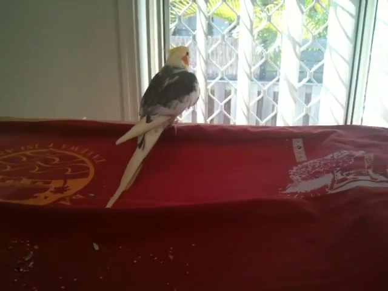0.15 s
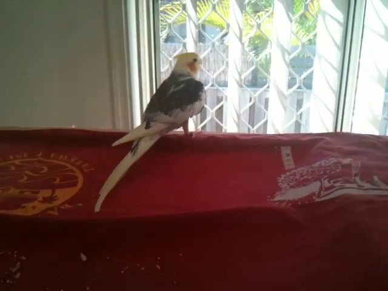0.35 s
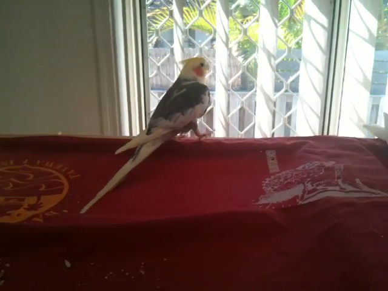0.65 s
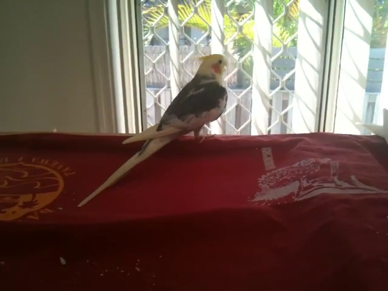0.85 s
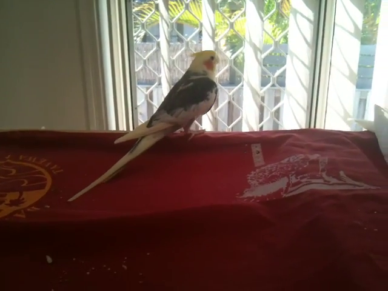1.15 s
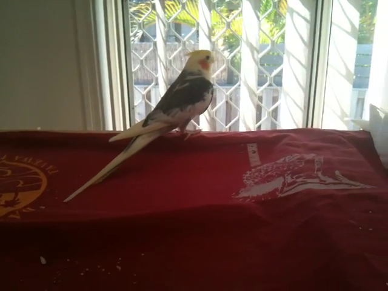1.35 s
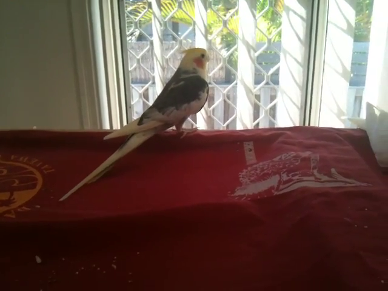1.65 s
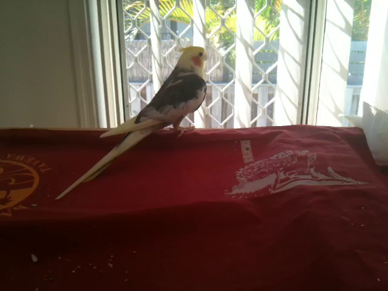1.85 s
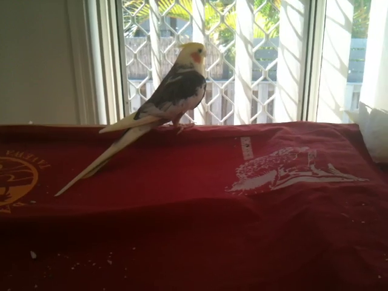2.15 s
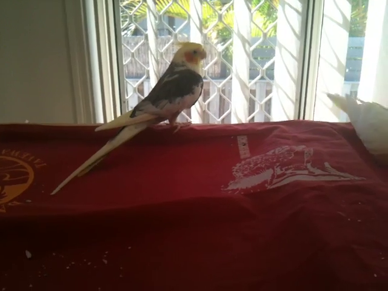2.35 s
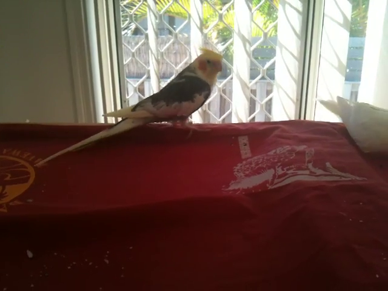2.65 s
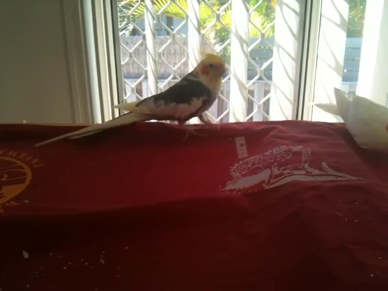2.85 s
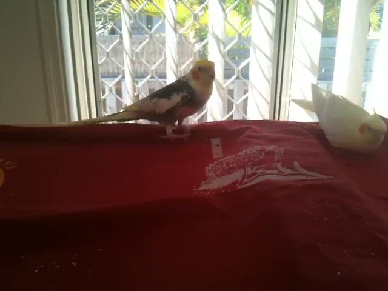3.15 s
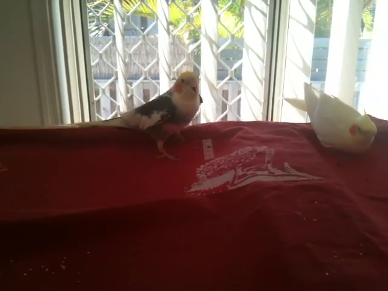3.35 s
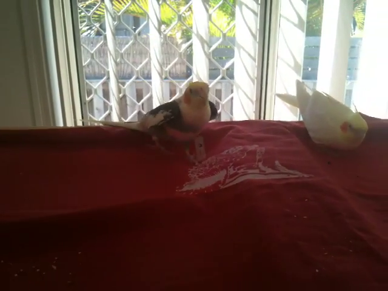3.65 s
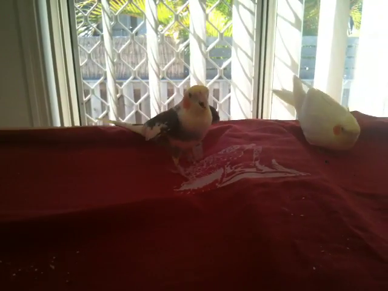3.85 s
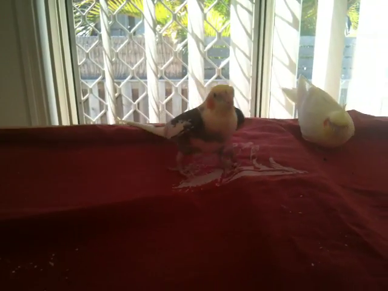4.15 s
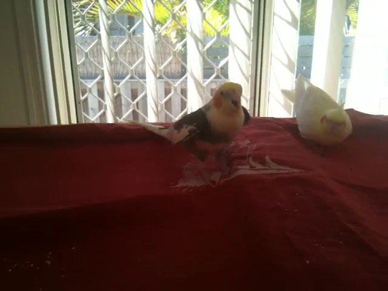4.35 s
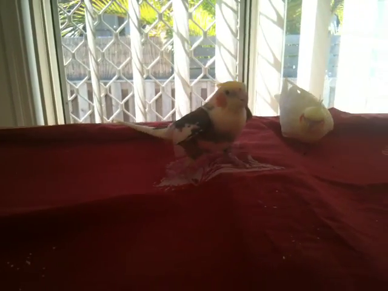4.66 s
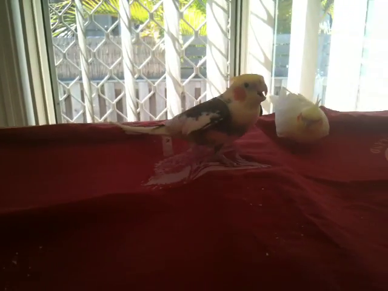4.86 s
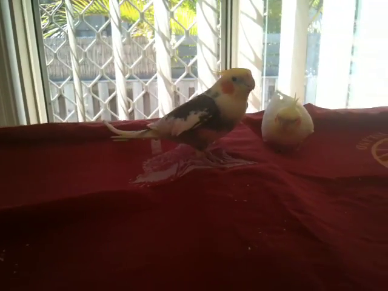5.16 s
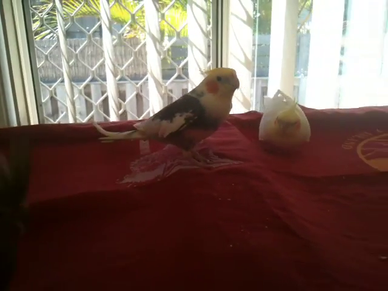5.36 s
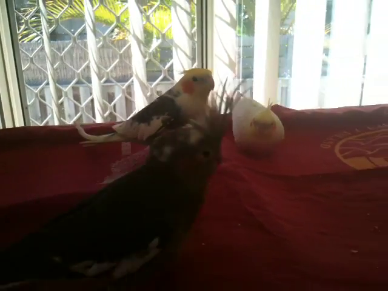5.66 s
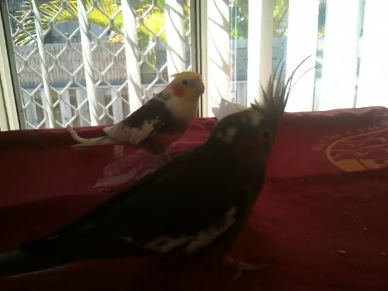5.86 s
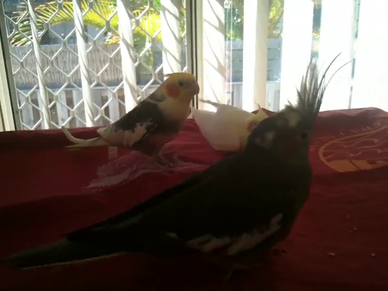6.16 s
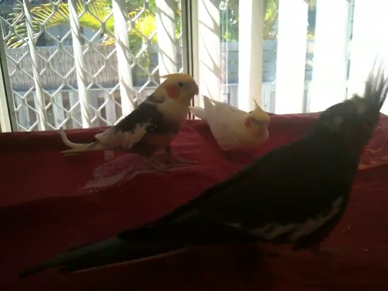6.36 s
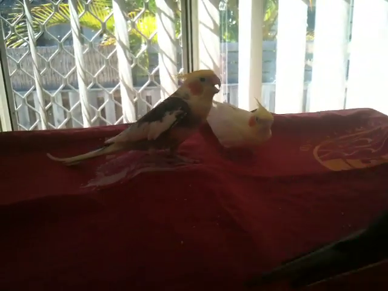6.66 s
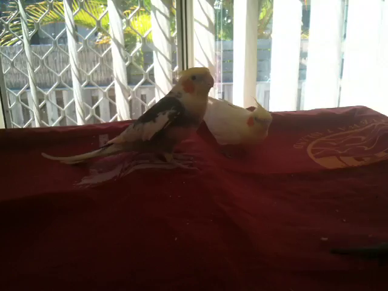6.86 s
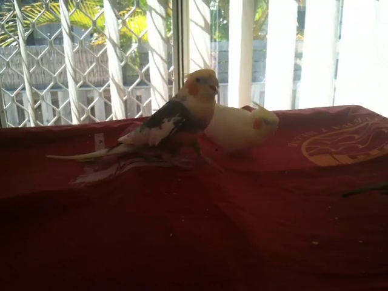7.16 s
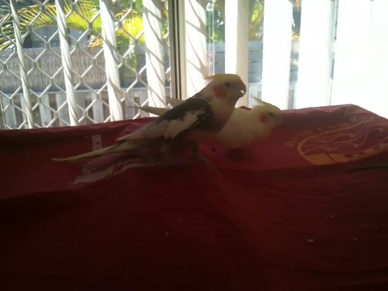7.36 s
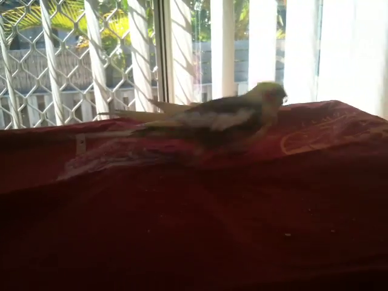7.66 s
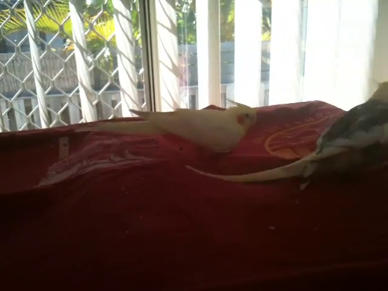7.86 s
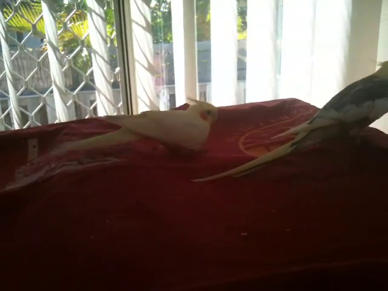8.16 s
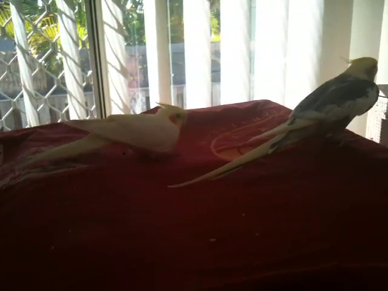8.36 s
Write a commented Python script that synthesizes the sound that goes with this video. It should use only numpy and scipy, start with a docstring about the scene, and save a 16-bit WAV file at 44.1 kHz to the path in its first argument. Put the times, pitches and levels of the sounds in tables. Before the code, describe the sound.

Piercing cockatiel calls repeat about twice a second in three bursts, with faint feather and cloth rustles between them indoors.

```python
"""A cockatiel's call is already sounding, with a higher, nearly pure whistle over it; three bursts of calls follow.
Each call is a stack of harmonics that slides up, cracks hoarsely into a lower register and holds a quavering note.
Between calls, shaped noise makes feathers and cloth rustle and a foot thump softly on the sofa.
Soft room noise and a faint wavering hum lie below; random echoes put the bird in a live room."""
import sys
import numpy as np
from scipy import signal
from scipy.fft import rfft, irfft, next_fast_len
from scipy.io import wavfile
from scipy.ndimage import map_coordinates

SR = 44100
rng = np.random.default_rng(int(sys.argv[2]) if len(sys.argv) > 2 else 0)


def master_out(mix):
    """Clip the mix to full scale and print it as 16-bit PCM to the path in sys.argv[1]."""
    frames = np.transpose(np.atleast_2d(mix))
    ceiling = np.clip(frames, -1, 1)
    pcm = np.round(ceiling * 32767).astype(np.int16)
    wavfile.write(sys.argv[1], SR, pcm)


N = 374850
LEAD = SR // 5  # samples made before time zero, as the first call is already under way
TIME = np.arange(-LEAD, N) / SR  # seconds

# Noise colours below give relative levels only: each noise is scaled to its own loudness afterwards.
# Colour of the room noise: pitch_hz, level_db (per Hz)
ROOM_TONE = [(25, -37), (60, -28), (82, -13), (95, -20), (125, -10), (165, -6.5), (250, -9.5), (500, -8.5),
             (700, -13.5), (1000, -16), (2300, -28), (5000, -30.5), (5750, -26), (6400, -30),
             (10000, -30.5), (15500, -34)]
# Steady tones of the hum, before a shared trim and waver: pitch_hz, level_db
HUM = [(177.6, -76.5), (301.5, -76), (339.1, -77), (393.0, -80.5)]
# Colour of feathers and cloth: pitch_hz, level_db (per Hz)
FEATHERS = [(150, -14), (450, -1), (1200, -3), (2500, -1), (5000, -2), (8000, -9), (15000, -16)]
# Rustles of feathers, claws and cloth: start_s, level_db, rise_s, decay_s
RUSTLES = [(2.88, -73, 0.0027, .05), (2.935, -70.5, 0.0007, .04), (5.655, -63, 0.0046, .25),
           (5.79, -69, .004, .1), (5.87, -68, .01, 0.33), (6.14, -64, .04, 0.38), (6.175, -55.5, .025, .32),
           (6.34, -65, .015, 0.29), (6.39, -69, .005, .15), (6.507, -65, 0.00081, 0.032),
           (6.531, -67, .001, 0.033), (7.915, -59, .025, 0.26)]
# Dull colour of a foot landing on the sofa: pitch_hz, level_db (per Hz)
CUSHION = [(100, -20), (270, 0), (600, -1), (1300, -8), (3000, -25), (12000, -45)]
# Path of the higher whistle, level before a trim: time_s, pitch_hz, level_db
HIGH_WHISTLE = [(-.06, 3150, -38), (-.02, 3485, -28.5), (0, 3360, -16.5), (0.014, 3337, -16),
                (.019, 3324, -42.5), (0.026, 3340, -46), (.03, 3290, -21), (.042, 2890, -29),
                (.055, 2500, -34), (.075, 2350, -50)]
# Throat and beak, as they colour the upper overtones: pitch_hz, level_db
BEAK = [(5200, 13), (5900, 2), (6600, 6.5), (7400, 1), (8600, -3), (9400, -13.5), (10300, -1.5),
        (11100, -4.5), (11900, -7), (12600, -14.5), (13200, -20), (14000, -36), (15300, -22), (16500, -33)]
# Colour of hoarse air: pitch_hz, level_db (per Hz)
RASP = [(200, -43.5), (600, -22), (1150, -12.5), (1500, -14), (2200, -13), (3200, -4), (4600, 3),
        (5800, -8.5), (7000, 1.5), (8500, -23.5), (9500, -20), (11000, -15), (12500, -27), (15000, -33)]
# Every call runs through the same stages: 0 onset, 1 slide, 2 summit, 3 break, 4 sag, 5 end.
# Loudness of a call, before each call's own levels: stage, fundamental_db, octave_db, upper_overtones_db
VOICE = [(0, -51, -53, -51), (1, -44, -40.5, -38), (1.12, -38.5, -30.5, -35), (1.22, -33.5, -19.3, -32),
         (1.33, -31.3, -18.7, -32.5), (1.6, -29.7, -22, -35), (2, -28.5, -25, -39.5),
         (2.5, -28.3, -31.5, -35), (3, -28.5, -45, -33), (3.25, -29, -39.5, -31.3),
         (3.5, -27.3, -29, -29.3), (3.8, -27, -27.5, -34.3), (4, -27, -33.5, -43), (4.6, -27, -41.5, -53.5),
         (5, -31, -46, -62)]
# Depth of the pitch's unsteadiness: stage, flutter_hz (regular), jitter_hz (random)
QUAVER = [(0, 35, 12), (1, 16, 10), (1.6, 14, 9), (1.85, 50, 12), (2.3, 110, 20), (2.7, 90, 40),
          (3, 50, 100), (3.18, 18, 16), (3.55, 9, 7), (3.8, 46, 14), (5, 58, 24)]
# One row per call; the levels are changes to the shared voice, except the two rasps:
#   slide_start_s, summit_s, break_s, sag_s, end_s,
#   start_hz, summit_hz, bend (1 = straight slide), held_hz, sag_hz, end_hz,
#   onset_db, slide_db, held_db, slide_overtones_db, held_octave_db, held_upper_overtones_db,
#   break_rasp_db, sag_rasp_db, extra_room_db (as the head turns away)
SONG = [(-.1, .04, .08, .215, .244, 1750, 2660, 2.2, 2200, 2090, 2100, 0, -1.5, -2, -1.5, -.5, -2, -43, -60, 4),
        (.387, .523, .565, .7, .724, 1760, 2700, 1.25, 2184, 2060, 2060, -2, -.5, -1.5, -1.5, .5, -1, -41, -60, 1.5),
        (.876, 1.02, 1.063, 1.165, 1.204, 1800, 2635, 2.2, 2178, 2088, 2170, 1, -2, -1, -.5, -.5, -.5, -45, -60, 2.5),
        (3.003, 3.132, 3.175, 3.29, 3.308, 1820, 2765, 1.25, 2230, 2130, 2130, -2, 2.5, -.5, -.5, -1, 1.5, -37, -60, -1.5),
        (3.427, 3.558, 3.598, 3.69, 3.734, 1780, 2625, 1.9, 2255, 2090, 2190, 3.5, 1.5, -1, 1, 3, 3.5, -37, -60, -1.5),
        (3.879, 4.007, 4.04, 4.153, 4.182, 1785, 2705, 1.5, 2185, 2090, 2130, 5.5, 2, 2.5, 0, .5, -1, -40, -47, -2.5),
        (4.319, 4.448, 4.492, 4.605, 4.66, 1750, 2670, 1.4, 2185, 2060, 2210, 2.5, 2, 1, 2, 2, 5, -39, -48, -3),
        (4.802, 4.928, 4.977, 5.08, 5.124, 1770, 2660, 1.3, 2165, 2040, 2140, 3, 1, -.5, 2.5, 5, 4, -39, -44, -3.5),
        (6.587, 6.703, 6.745, 6.865, 6.888, 1800, 2685, 1.75, 2215, 2225, 2380, -2.5, 2.5, 5.5, -.5, -6, -7.5, -40, -60, -1),
        (7.018, 7.152, 7.195, 7.305, 7.355, 1790, 2780, 1.25, 2220, 2090, 2280, -2.5, 0, 1.5, 2.5, 2, -.5, -46, -60, -1.5),
        (7.494, 7.631, 7.681, 7.783, 7.82, 1840, 2670, 1.45, 2255, 2040, 2250, 3, -1.5, 2, -.5, -1.5, 0, -44, -54, -1.5),
        (7.957, 8.08, 8.125, 8.232, 8.28, 1840, 2720, 1.25, 2175, 2030, 2190, 3.5, 0, -2, -3.5, -2, 1.5, -41, -60, 1.5)]
# How fast echoes fade by 60 dB: pitch_hz, fade_s
ROOM_DECAY = [(300, .6), (2200, 0.87), (4300, 0.62), (7000, 0.53), (11000, 0.33), (15000, 0.27)]
# The beak beams its treble at the walls: pitch_hz, reflected_db
BEAMING = [(2200, .5), (4500, 0.5), (7000, 2), (11000, 4.5), (15000, 2)]
# The microphone's dips in the treble: pitch_hz, level_db
MICROPHONE = [(5150, 0), (5750, -6), (6400, 0), (11200, 0), (12000, -4), (13000, 0), (15300, 0),
              (15800, -5)]

STEP_S, STEP_DB = 7.905, -56  # time and level of the footfall
ONSET_S = .023  # the voice starts softly, on one pitch, this long before the slide
LANDING = .975  # pitch at the break, as a share of the held pitch
LANDING_LEAD_S = .011  # the tumble lands this long before the hoarse break
CREST_SHARE = .48  # how far from break to sag the held note crests
CATCH_S, SAG_CATCH_LAG_S = .012, .012  # width of a hoarse catch; delay of the second one after the sag
VOICE_DB = -1.3  # trim of the whole whistle
SLIDE_TILT_DB, HELD_TILT_DB = .8, -1.3  # per harmonic, among upper overtones: the slide is shriller
TOP_HZ = 15800  # nothing above this is kept


def amp(db):
    """Turn decibels into a gain."""
    return 10 ** (np.asarray(db) / 20)


def unit(x):
    """Scale to an rms (average strength) of 1."""
    return x / np.sqrt(np.mean(x ** 2) + 1e-20)


def along(points, hz):
    """Read a curve of (pitch, value) points, with pitch on a log axis."""
    pitches, values = np.transpose(points)
    return np.interp(np.log(hz + 1), np.log(pitches), values)


def curves(rows, at):
    """Join each column after the first by straight lines."""
    positions, *columns = np.transpose(rows)
    return [np.interp(at, positions, column) for column in columns]


def wobble(rate, size):
    """Draw a smooth random curve through `rate` random points a second."""
    points = rng.standard_normal(size // 8 + 4)
    return map_coordinates(points, [np.arange(size) * rate / SR])


def noise(spectrum, size):
    """Filter white noise to a colour, with an rms of 1."""
    gain = amp(along(spectrum, np.fft.rfftfreq(size, 1 / SR)))
    white = rng.standard_normal(size)
    return unit(irfft(rfft(white) * gain, size))


def add(track, start, x):
    """Mix a sound into the track from its start time on."""
    first = max(round(start * SR) + LEAD, 0)
    part = track[first:][:len(x)]
    part += x[:len(part)]


def swell_and_fade(rise, decay):
    """Rise like half a bell curve up to time zero, then fade by 60 dB over the decay."""
    t = np.arange(-2 * rise, decay, 1 / SR)
    rising = np.exp(-(t / rise) ** 2)
    fading = np.exp(-np.log(1000) * t / decay)
    return t, np.where(t < 0, rising, fading)


def background(floor_db=-66, hum_db=-1.5, waver_db=3.5):
    """Soft room noise and the hum of an appliance, each tone slowly wavering in loudness."""
    size = len(TIME)
    hum = np.zeros(size)
    for hz, db in HUM:
        hum += amp(db + hum_db + waver_db * wobble(3, size)) * np.sin(2 * np.pi * hz * TIME)
    return amp(floor_db) * noise(ROOM_TONE, size) + np.sqrt(2) * hum


def in_room(x, wet_db=0, tail_db=-11.5, walls_db=-14):
    """Add near reflections and a fading wash of echoes, drawn anew for each sound."""
    hz, t, z = signal.stft(rng.standard_normal(SR), SR, nperseg=256)
    # each pitch in the noise fades at its own speed
    fade = amp(-60 * t / along(ROOM_DECAY, hz)[:, None])
    tail = signal.istft(z * fade, SR, nperseg=256)[1]
    echoes = amp(tail_db) * tail[:SR] / np.linalg.norm(tail)
    count = 6
    delays = rng.uniform(.002, .022, count)  # seconds
    echoes[(delays * SR).astype(int)] += amp(walls_db) * rng.choice([-1, 1], count) / np.sqrt(count)
    beam = amp(wet_db + along(BEAMING, np.fft.rfftfreq(2 * SR, 1 / SR)))
    response = irfft(rfft(echoes, 2 * SR) * beam)[:SR]
    response[0] += 1  # the direct sound
    # a head turned away sends less sound to the microphone
    return signal.fftconvolve(x, response) * amp(-.25 * wet_db)


def rustle(level_db, rise, decay, grain_db=3.8):
    """Feathers or cloth: noise with random grain that swells and dies away."""
    t, swell = swell_and_fade(rise, decay)
    grain = amp(grain_db * wobble(300, len(t)))
    return t[0], amp(level_db) * swell * unit(noise(FEATHERS, len(t)) * grain)


def footfall(rise=.006, decay=.16):
    """A foot on the cushion: a short, dull burst of noise."""
    t, swell = swell_and_fade(rise, decay)
    return STEP_S + t[0], amp(STEP_DB) * swell * noise(CUSHION, len(t))


def high_whistle(octave_db=-21, jitter_hz=45, whistle_db=-1.5):
    """A nearly pure note that holds, catches and falls away, with two weak overtones."""
    t = np.arange(HIGH_WHISTLE[0][0], HIGH_WHISTLE[-1][0], 1 / SR)
    pitch, level = curves(HIGH_WHISTLE, t)
    unsteady_pitch = pitch + jitter_hz * wobble(300, len(t))
    phase = 2 * np.pi * np.cumsum(unsteady_pitch) / SR
    overtones = np.sin(2 * phase) + .5 * np.sin(3 * phase)
    tone = np.sin(phase) + amp(octave_db) * overtones
    return t[0], np.sqrt(2) * amp(level + whistle_db) * tone


def catch(level_db, width, grit_db=3):
    """A short gritty rasp where the syrinx, the bird's voice organ, loses its pitch."""
    t = np.arange(-3 * width, 3 * width, 1 / SR)
    grit = unit(noise(RASP, len(t)) * amp(grit_db * wobble(350, len(t))))
    bell = np.exp(-.5 * (t / width) ** 2)
    return t[0], amp(level_db) * bell * grit


def call_pitch(t, times, pitches):
    """The slide bends up to its summit, then tumbles to a held note that arches, sags and moves to its end pitch."""
    slide_s, summit_s, break_s, sag_s, end_s = times
    start_hz, summit_hz, bend, held_hz, sag_hz, end_hz = pitches
    left = 1 - np.clip((t - slide_s) / (summit_s - slide_s), 0, 1)  # share of the slide still to go
    slide = summit_hz - (summit_hz - start_hz) * left ** bend
    crest_s = break_s + CREST_SHARE * (sag_s - break_s)
    turn_times = [summit_s, break_s - LANDING_LEAD_S, crest_s, sag_s, end_s]
    turns = [summit_hz, LANDING * held_hz, held_hz, sag_hz, end_hz]
    numbers = np.arange(len(turns))
    step = np.interp(t, turn_times, numbers)
    # ease the pitch through each turn, partly rounding its corner
    eased = step - np.sin(2 * np.pi * step) / (4 * np.pi)
    return np.where(t < summit_s, slide, np.interp(eased, numbers, turns))


def call(times, pitches, levels, choke_db=3.5, flutter_hz=72, fade=0.0048, choke_width=0.013,
         air_db=-40, squeak_db=-37, shimmer_db=1.59, upper_shimmer_db=2.5):
    """One call: a harmonic whistle that flutters around its summit, breaks up, then settles lower."""
    slide_s, summit_s, break_s, sag_s, end_s = times
    onset_db, slide_db, held_db, slide_bright_db, held_octave_db, held_upper_db = levels
    marks = [slide_s - ONSET_S, *times]
    t = np.arange(marks[0], end_s + fade, 1 / SR)
    size = len(t)
    stage = np.interp(t, marks, np.arange(len(marks)))
    held = np.interp(t, [break_s, end_s], [0, 1])

    # each register has its own strength and brightness
    level_times = [slide_s, slide_s + ONSET_S, summit_s, break_s]
    level = np.interp(t, level_times, [onset_db, slide_db, slide_db, held_db])
    registers = [(summit_s, slide_bright_db, slide_bright_db, SLIDE_TILT_DB),
                 (break_s, held_octave_db, held_upper_db, HELD_TILT_DB)]
    octave_lift, upper_lift, tilt_db = curves(registers, t)
    first, second, upper = level + np.array(curves(VOICE, stage))

    # regular flutter and random jitter make the pitch quaver
    flutter, jitter = curves(QUAVER, stage)
    tremor = np.sin(2 * np.pi * np.cumsum(flutter_hz * (1 + .17 * wobble(50, size))) / SR)
    pitch = call_pitch(t, times, pitches)
    pitch = pitch + flutter * tremor + jitter * wobble(900, size) + 15 * wobble(70, size)
    phase = 2 * np.pi * np.cumsum(pitch) / SR

    # the upper overtones share their power unevenly as they slide through the resonances of the beak
    orders = np.arange(3, 9)[:, None]
    shares = amp(along(BEAK, orders * pitch) + tilt_db * orders)
    shares *= orders * pitch < SR / 2  # leave out pitches too high for the sample rate
    shares *= amp(upper_shimmer_db * np.array([wobble(180, size) for _ in orders]))
    overtones = (shares * np.sin(orders * phase)).sum(0) / np.linalg.norm(shares, axis=0)

    tone = amp(first) * np.sin(phase)
    tone += amp(second + octave_lift) * np.sin(2 * phase)
    tone += amp(upper + upper_lift) * overtones
    # a thin extra seventh harmonic grows through the held note
    tone += amp(first + squeak_db) * held * np.sin(7 * phase)

    # the flutter shakes the loudness too, with more effect late in the call
    shake_db = (.022 + 0.019 * held) * flutter * tremor + shimmer_db * wobble(140, size)
    # the tone chokes for an instant at the break
    breaking = np.exp(-.5 * ((t - break_s) / choke_width) ** 2)
    tone *= np.sqrt(2) * amp(VOICE_DB + shake_db - choke_db * breaking)
    # more hoarse air escapes where the flutter is wide
    air = amp(first + air_db) * (1 + flutter / 30) * noise(RASP, size)
    gate = np.clip(np.minimum(t - t[0], t[-1] - t) / fade, 0, 1)
    return t[0], gate * (tone + air)


def scene():
    """Mix the background, the calls with their hoarse catches, the high whistle and the movements."""
    track = background()
    for row in SONG:
        times, pitches, levels = row[:5], row[5:11], row[11:17]
        break_rasp_db, sag_rasp_db, wet_db = row[17:]
        _, _, break_s, sag_s, _ = times
        start, sound = call(times, pitches, levels)
        add(track, start, in_room(sound, wet_db))
        for catch_s, rasp_db in [(break_s, break_rasp_db), (sag_s + SAG_CATCH_LAG_S, sag_rasp_db)]:
            offset, sound = catch(rasp_db, CATCH_S)
            add(track, catch_s + offset, in_room(sound))
    for start, sound in [high_whistle(), footfall()]:
        add(track, start, in_room(sound))
    for rustle_s, *shape in RUSTLES:
        offset, sound = rustle(*shape)
        add(track, rustle_s + offset, in_room(sound))
    return track[None, LEAD:]


def record(dry):
    """The microphone colours the treble and keeps nothing above its band limit."""
    size = next_fast_len(N + SR // 2)
    hz = np.fft.rfftfreq(size, 1 / SR)
    gain = amp(along(MICROPHONE, hz)) * (hz < TOP_HZ)
    return irfft(rfft(dry, size) * gain, size)[..., :N]


dry = scene()
out = record(dry)
master_out(out)
```